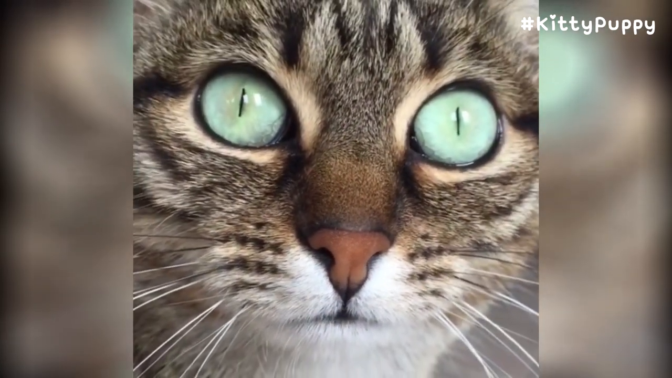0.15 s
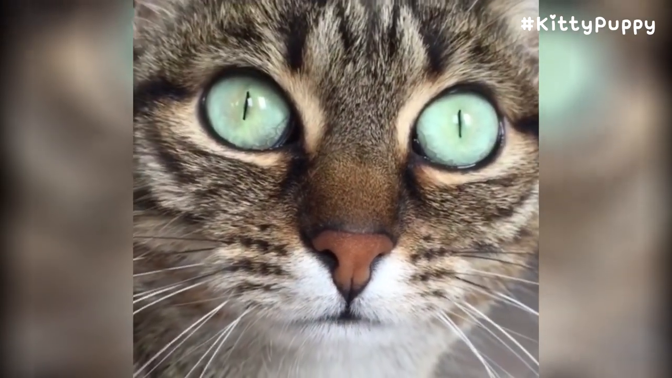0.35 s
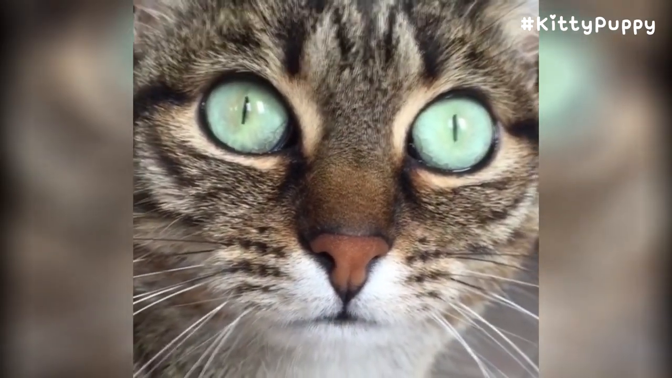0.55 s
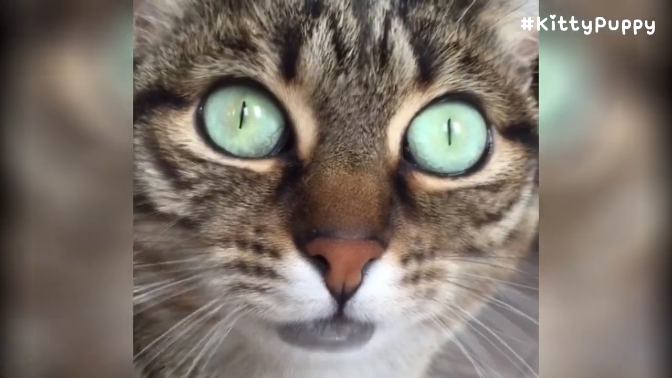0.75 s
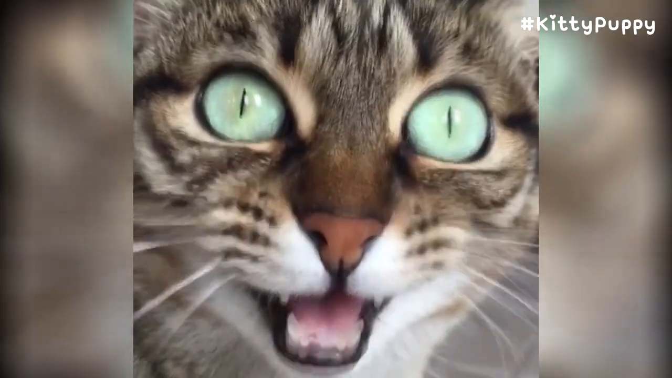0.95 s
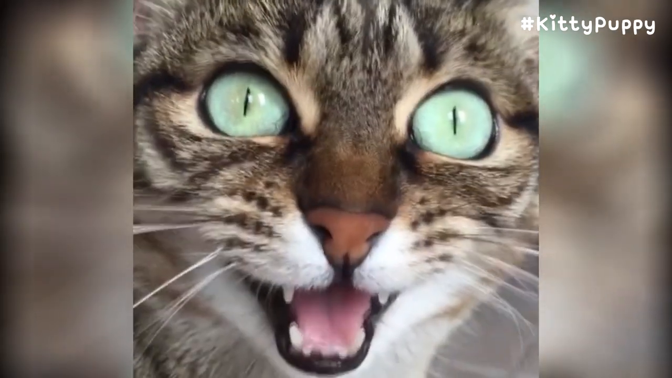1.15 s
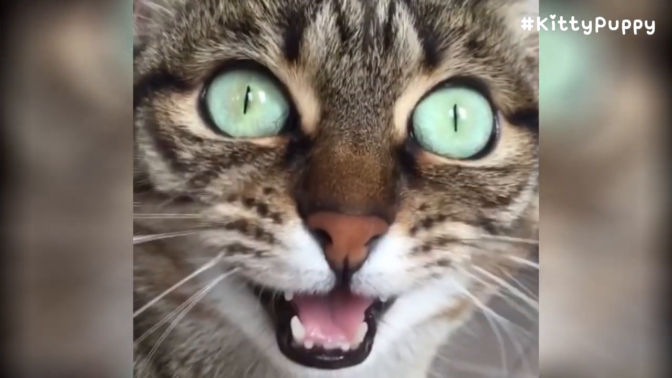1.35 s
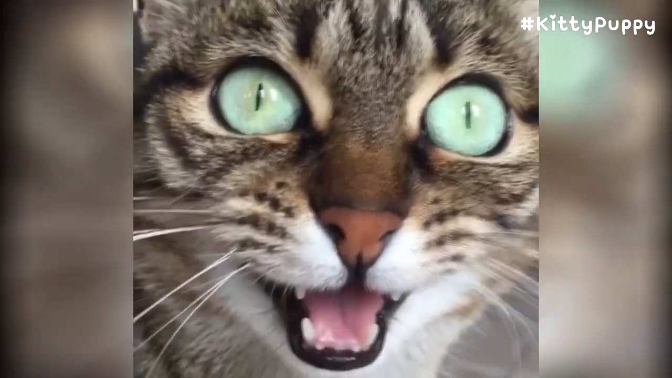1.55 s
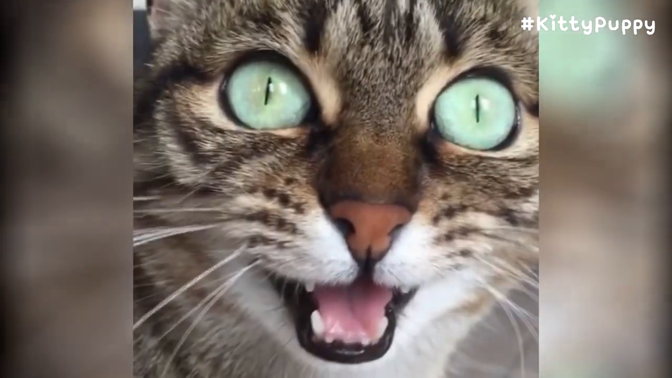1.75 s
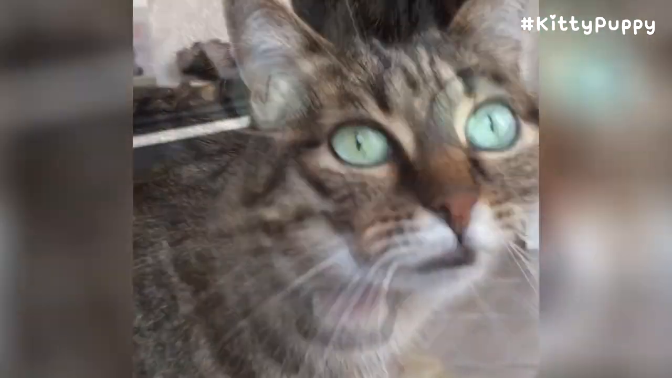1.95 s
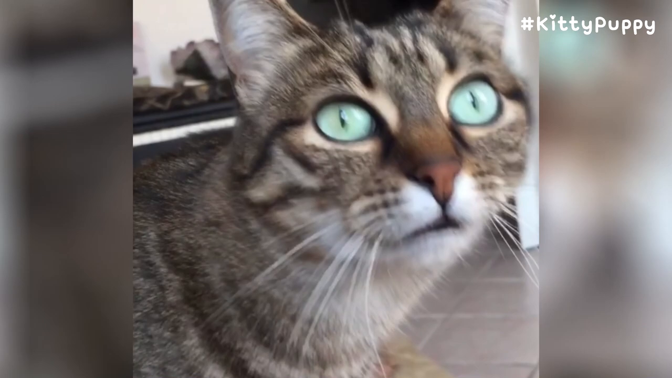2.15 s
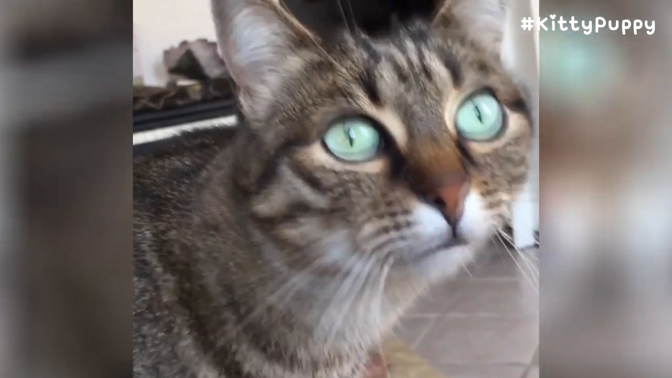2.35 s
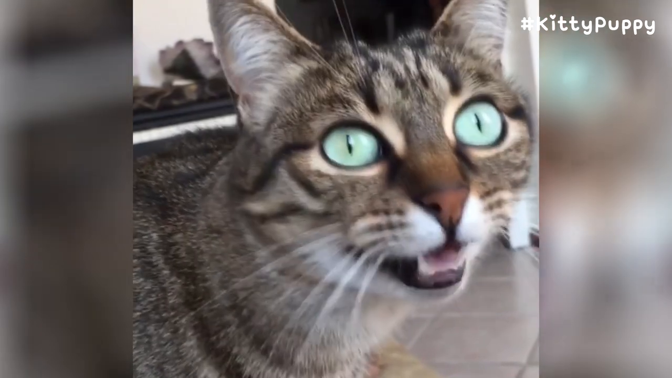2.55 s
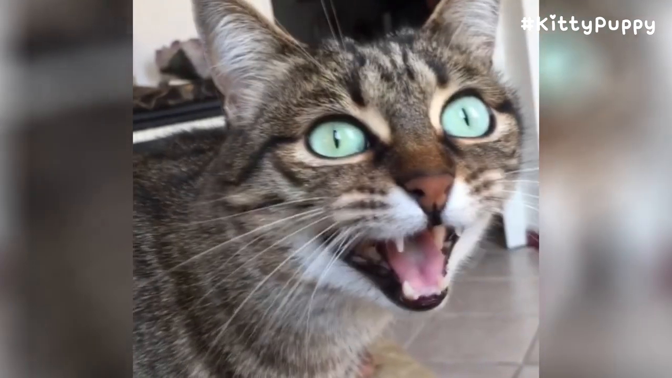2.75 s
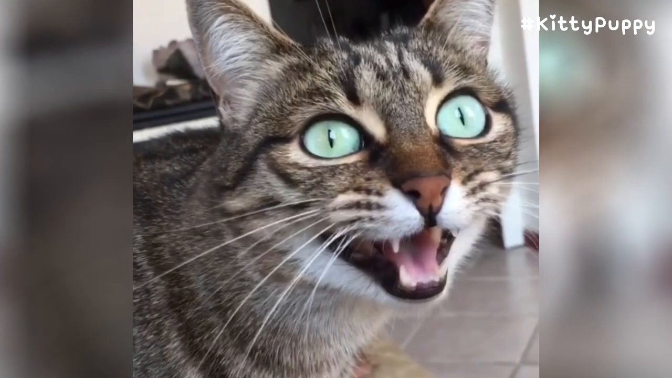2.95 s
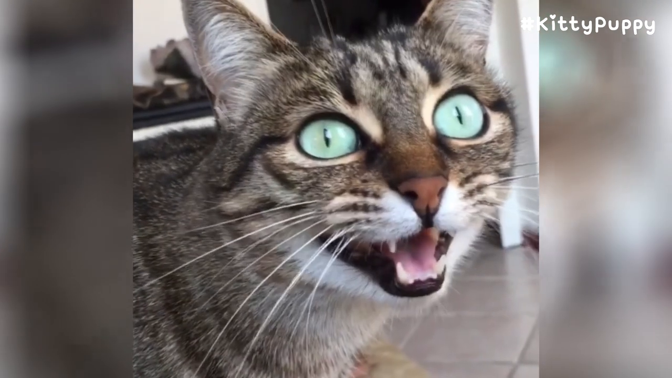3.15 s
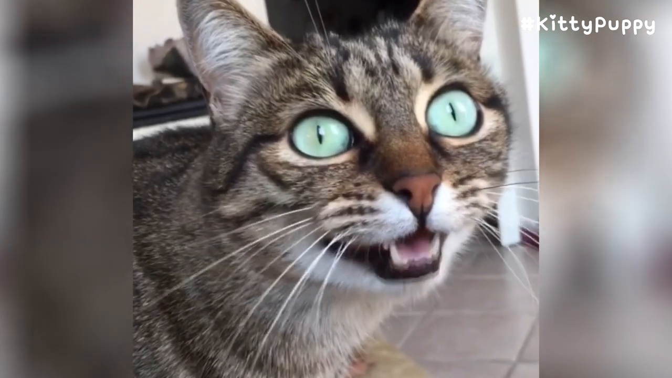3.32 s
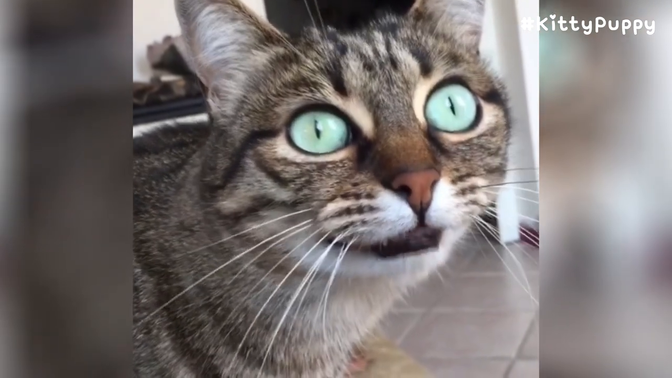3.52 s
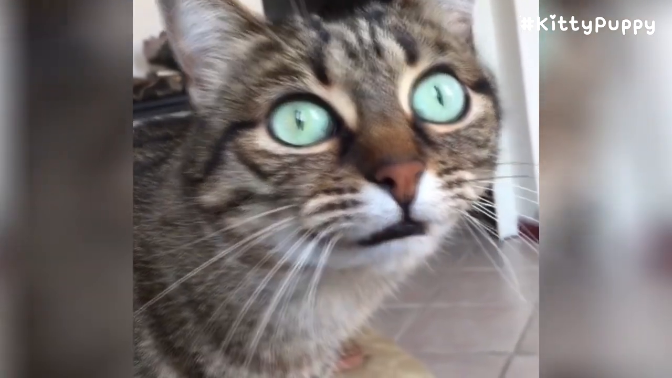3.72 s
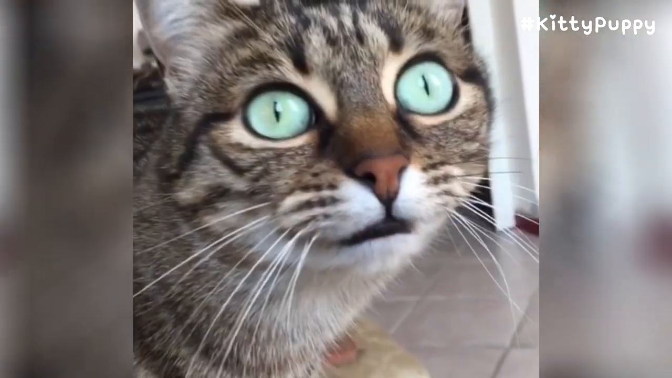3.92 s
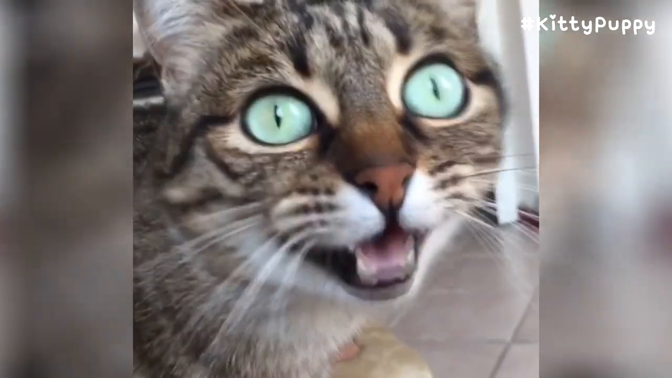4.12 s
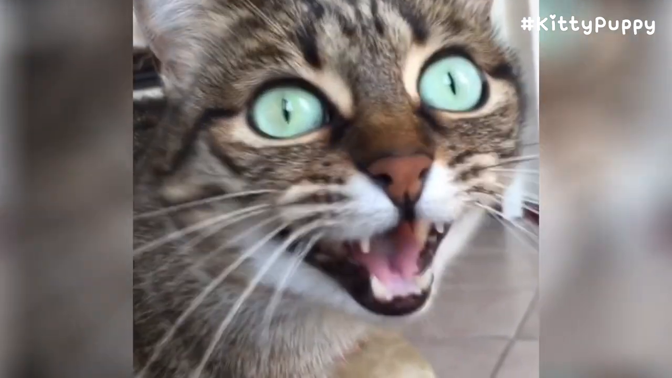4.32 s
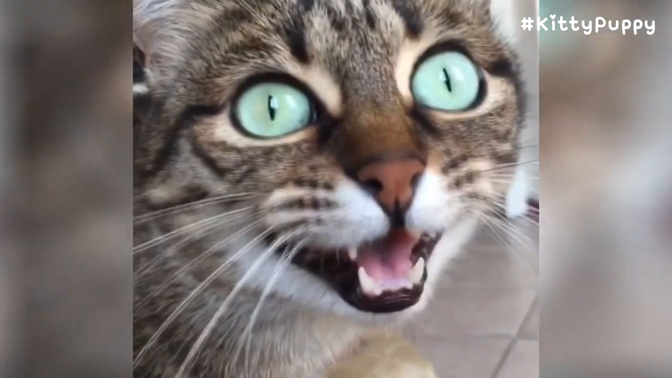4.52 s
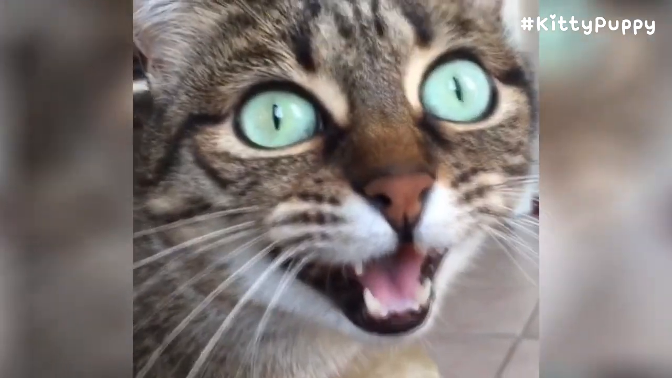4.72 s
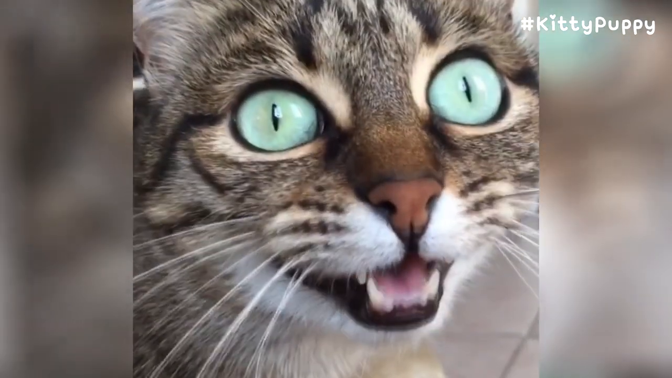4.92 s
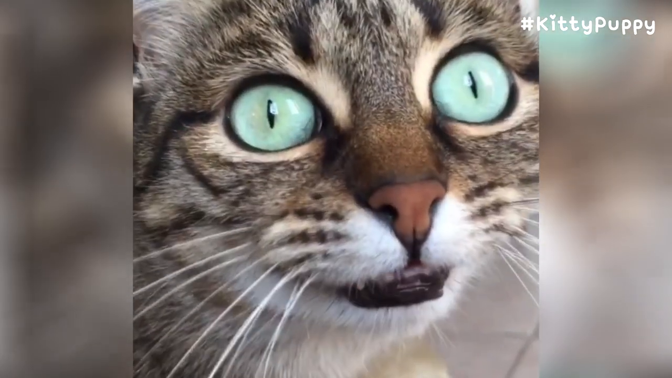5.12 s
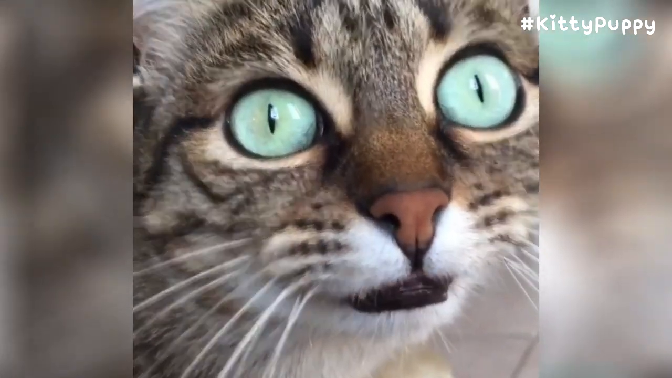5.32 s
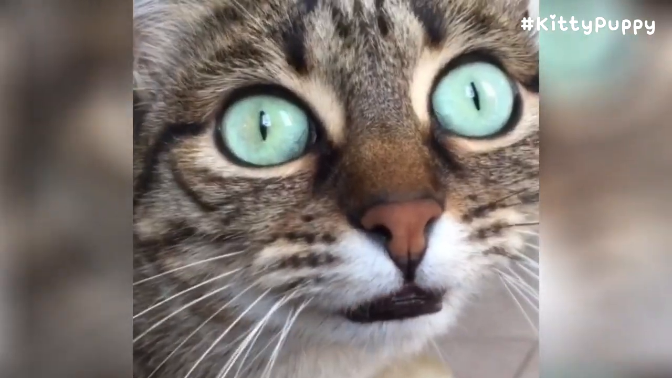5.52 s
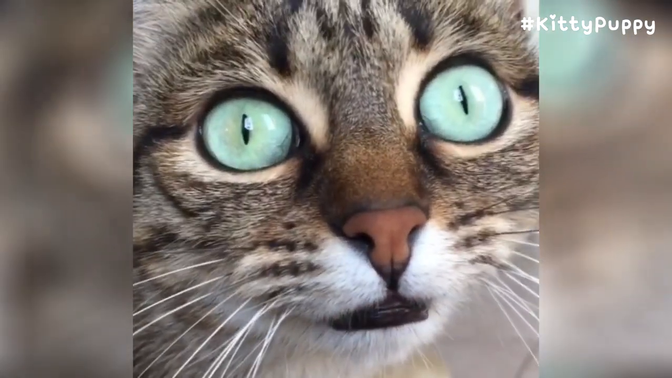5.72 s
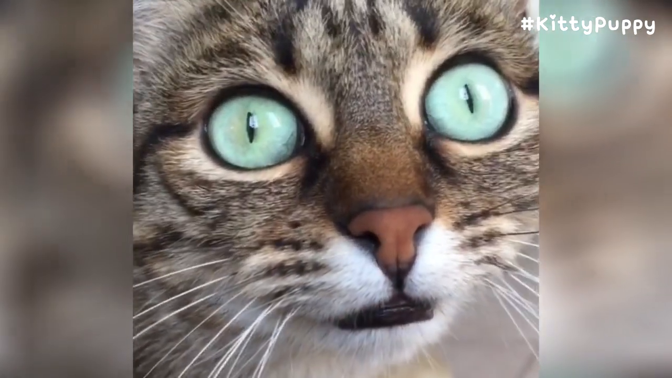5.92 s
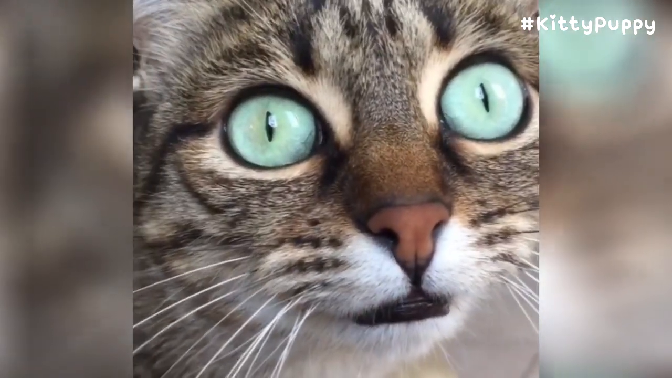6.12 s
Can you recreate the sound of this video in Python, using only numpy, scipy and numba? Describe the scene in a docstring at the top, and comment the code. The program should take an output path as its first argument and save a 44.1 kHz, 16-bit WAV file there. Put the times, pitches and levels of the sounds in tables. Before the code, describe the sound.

A cat close to the microphone gives a hoarse chatter ending in a squeak, a wavering trill, then two mews with wet mouth clicks.

```python
"""A cat close to a small microphone gives four calls: a hoarse chatter ending in a squeak, a wavering trill, two mews.
Its vocal folds send out pulses that ring the throat and mouth; tongue and lips click around the calls.
Behind it, two quiet rooms of shaped noise follow one another: the first has a low hum,
and a rumble grows late in the second."""
import sys
import numpy as np
from scipy import signal
from scipy.fft import rfft, irfft, next_fast_len
from scipy.io import wavfile
from scipy.ndimage import uniform_filter1d, map_coordinates
from numba import njit

SR = 44100
rng = np.random.default_rng(int(sys.argv[2]) if len(sys.argv) > 2 else 0)


def log_audio(samples):
    """Write samples as a 16-bit WAV file to the path given in sys.argv[1]."""
    # one column per channel
    frames = np.atleast_2d(samples).T
    # limit to full scale, then quantise
    limited = np.clip(frames, -1, 1)
    pcm = np.round(limited * 32767).astype(np.int16)
    wavfile.write(sys.argv[1], SR, pcm)


N = 276507  # length of the sound in samples


def amp(db):
    """Turn dB into a gain."""
    return 10 ** (np.asarray(db) / 20)


def along(points, hz):
    """Read a curve of (Hz, value) points on a log frequency axis."""
    point_hz, values = np.transpose(points)
    return np.interp(np.log(hz + 1), np.log(point_hz + 1), values, left=values[0], right=values[-1])


def curves(rows):
    """Draw one curve over time for each column after the first, which is the time."""
    seconds, *columns = np.transpose(rows)
    return [np.interp(np.arange(N) / SR, seconds, column) for column in columns]


def filtered(x, response):
    """Multiply the spectrum of x by a response, given as a function of frequency."""
    size = next_fast_len(N + 8192)
    hz = np.fft.rfftfreq(size, 1 / SR)
    return irfft(rfft(x, size) * response(hz), size)[:N]


def unit(x):
    """Scale x by its overall spread, to an rms of 1."""
    return x / x.std()


def noise(spectrum):
    """Coloured noise of rms 1; only the shape of the spectrum matters."""
    return unit(filtered(rng.standard_normal(N), lambda hz: amp(along(spectrum, hz))))


def even(x, size=900):
    """Hold x at an rms of 1 over a sliding stretch of samples."""
    power = np.abs(uniform_filter1d(x * x, size))
    return x / np.sqrt(power + 1e-12)


def wobble(rate):
    """A smooth random curve through `rate` random points a second."""
    points = rng.standard_normal(int(N * rate / SR) + 4)
    return map_coordinates(points, [np.arange(N) * rate / SR])


@njit
def resonate(x, hz, width_hz, rate):
    """A cavity that rings at a moving frequency; the wider the resonance, the sooner it dies."""
    y = np.zeros(len(x))
    r = np.exp(-np.pi * width_hz / rate)
    for i in range(2, len(x)):
        push = (1 - r) * (x[i] - x[i - 2])
        y[i] = push + 2 * r * np.cos(2 * np.pi * hz[i] / rate) * y[i - 1] - r * r * y[i - 2]
    return y


# The colour of each room's hiss. Each row: frequency in Hz, relative level in dB per Hz.
FIRST_ROOM_COLOUR = [(12, -33.5), (20, -4.5), (125, -3.5), (242, -13), (318, -19), (418, -20), (763, -22.5),
                     (899, -20.5), (1030, -20.5), (1220, -23), (4910, -30.5), (8490, -34), (13900, -40)]
SECOND_ROOM_COLOUR = [(12, -46.5), (20, -21), (49, -3), (129, -6), (211, -7.5), (293, -4.5), (385, -11),
                      (520, -14.5), (580, -16.5), (924, -15.5), (1000, -13), (1390, -20.5), (2340, -19.5),
                      (13900, -32.5)]
MOVE_S = 1.998  # from here on only the second room is heard
FIRST_DB, SECOND_DB = -53, -56  # hiss levels


def room_hiss(first):
    """Each room is a steady noise of its own colour; `first` is 1 in the first room, 0 in the second."""
    first_hiss = amp(FIRST_DB) * noise(FIRST_ROOM_COLOUR)
    second_hiss = amp(SECOND_DB) * noise(SECOND_ROOM_COLOUR)
    return first * first_hiss + (1 - first) * second_hiss


# Swells of the hum. Each row: time of the middle in seconds, rise over the plain hum in dB.
HUM_SWELLS = [(.45, 10.5), (.89, 18.5), (1.2, 18), (1.76, 9.5)]
HUM_DB, SWELL_S = -64, 0.086  # level between swells; half width of a swell in seconds


def hum(t):
    """A low tone near 118 Hz whose pitch and level waver, with a few smooth swells."""
    swells_db = sum(db * np.exp(-.5 * ((t - s) / SWELL_S) ** 2) for s, db in HUM_SWELLS)
    level_db = HUM_DB + swells_db + 0.43 * wobble(13.5)
    cycles = np.cumsum(118 + 3 * wobble(8.6)) / SR
    return amp(level_db) * np.sqrt(2) * np.sin(2 * np.pi * cycles)


# Fuzzy steady tones. Each row: centre in Hz, width in Hz, level in dB.
ROOM_TONES = [(47.4, 22, -64.5), (305, 2.6, -68.5)]


def room_tones():
    """Each tone is a narrow band of noise, 50 dB weaker two widths from its centre."""
    total = 0
    for hz, width_hz, db in ROOM_TONES:
        band = [(hz - 2 * width_hz, -50), (hz, 0), (hz + 2 * width_hz, -50)]
        total = total + amp(db) * noise(band)
    return total


# The colour of the rumble. Each row: frequency in Hz, relative level in dB per Hz.
RUMBLE_COLOUR = [(20, -45), (40, 4.5), (90, -0.5), (135, -1), (200, -50.5)]
RUMBLE_S, RUMBLE_DB, RUMBLE_DB_PER_S = 4.05, -65.5, 4.5  # start, level there, steady growth
SURGE_DB, SURGE_S = 10, 0.11  # extra level at the very end and how quickly it builds, in seconds


def rumble(t):
    """Low noise with an unsteady level that creeps up and surges at the end."""
    growth_db = RUMBLE_DB_PER_S * (t - RUMBLE_S)
    surge_db = SURGE_DB * np.exp((t - t[-1]) / SURGE_S)
    level_db = RUMBLE_DB + growth_db + surge_db + 5.2 * wobble(19)
    fade_in = np.clip((t - RUMBLE_S) * 10, 0, 1)
    return fade_in * amp(level_db) * noise(RUMBLE_COLOUR)


def background():
    """Hiss of two rooms, the hum of the first, fuzzy tones and a rumble that grows in the second."""
    t = np.arange(N) / SR
    first = np.clip((MOVE_S - t) / .004, 0, 1)
    return room_hiss(first) + first * hum(t) + room_tones() + rumble(t)


# How long the walls answer. Each row: frequency in Hz, time to fade by 60 dB in seconds.
WALL_FADES = [(300, .15), (3000, .11), (10000, .07)]


def walls(x):
    """The room's answer is a noise tail in which each frequency dies at its own speed."""
    hz, t, bands = signal.stft(rng.standard_normal(SR // 3), SR, nperseg=256)
    fade = amp(-60 * t / along(WALL_FADES, hz)[:, None])
    tail = signal.istft(bands * fade, SR, nperseg=256)[1]
    late = np.pad(x, (200, 0))  # the answer comes 200 samples later
    return signal.fftconvolve(late, tail / np.linalg.norm(tail))[:N]


# Tongue and lip clicks. Each row: start in seconds, level in dB, ring in Hz,
# hiss in dB relative to the click, before a shared boost.
CLICKS = [(.7068, -22, 5300, -20), (.7642, -28, 2400, -34), (.8445, -7, 2900, -22), (1.403, -33, 2900, -32),
          (1.844, -39, 2800, -6), (1.952, -38, 3160, -26), (1.9835, -43, 3000, -20),
          (2.5375, -30, 2640, -18), (2.5485, -29, 2850, -24), (3.465, -40, 2300, -18),
          (4.0727, -31, 2830, -16), (4.1095, -37, 2600, -32), (4.262, -19, 2100, -34),
          (4.3115, -12, 2450, -26), (4.316, 0, 3200, -30), (4.883, -23, 2300, -28), (5.056, -55, 2600, 10),
          (5.0903, -27, 3070, -28)]
CLICK_T60, SNAP_DB = .008, -6  # ring time of a faint click in seconds; a click this loud rings half as long


def clicks():
    """Each wet click rings two mouth cavities and the throat briefly under a spit of hiss."""
    out, t = np.zeros(N + SR), np.arange(SR // 20) / SR
    rise = 1 - np.exp(-t / .00015)
    spits = rng.standard_normal((len(CLICKS), len(t)))
    for (s, db, hz, hiss_db), spit in zip(CLICKS, spits):
        t60 = CLICK_T60 / (1 + amp(db - SNAP_DB))
        tone = lambda ratio: np.sin(2 * np.pi * ratio * hz * t)
        ring = (1.4 * tone(1) + .4 * tone(1.6) + .3 * tone(.4)) * amp(-60 * t / t60)
        hiss_fade = amp(hiss_db + 4.5 - 60 * t / 0.0048)
        hiss = hiss_fade * np.diff(spit, prepend=0)  # the difference brightens it
        out[round(s * SR):][:len(t)] += amp(db) * rise * (ring + hiss)
    return out[:N]


# Spells of uneven beating of the folds; the strongest one counts.
# Each row: start in seconds, end in seconds, hoarseness from 0 to 1.
RASPS = [(.85, .915, .55), (.945, 1.068, .76), (1.115, 1.135, .45), (1.178, 1.19, .4), (.85, 1.19, .26),
         (1.41, 1.93, .18), (1.635, 1.65, .35), (1.715, 1.75, .35), (1.79, 1.802, .4), (1.85, 1.875, .35),
         (2.56, 2.59, .48), (2.56, 2.8, .15), (3.355, 3.44, .13), (4.11, 4.31, .23), (4.315, 4.345, .55),
         (4.35, 4.45, .13), (4.45, 4.72, .09), (4.88, 5, .15)]
CLEAR, RASP_EDGE_S = .05, .012  # hoarseness of a relaxed voice; seconds for a rasp to come or go


def hoarseness():
    """A clear voice, torn by each rasp while it lasts."""
    t = np.arange(N) / SR
    spells = []
    for start, end, hoarse in RASPS:
        times = [start - RASP_EDGE_S, start, end, end + RASP_EDGE_S]
        spells.append(np.interp(t, times, [CLEAR, hoarse, hoarse, CLEAR]))
    return np.max(spells, axis=0)


def folds(pitch_hz, hoarse, waver=.1, jitter=.15, shimmer_db=5, breath=.8):
    """One pulse a cycle; hoarseness makes the pitch waver, then tears timing and size and lets air puff through."""
    cycles = np.cumsum(pitch_hz * (1 + waver * hoarse * wobble(90))) / SR
    torn = hoarse ** 1.5
    # the moment of each pulse, in samples
    at = np.interp(np.arange(1, int(cycles[-1]) - 2), cycles, np.arange(N))
    chance = rng.standard_normal((N // 40, 2))[:len(at)] * torn[at.astype(int), None]
    period = SR / pitch_hz[at.astype(int)]
    at = np.clip(at + jitter * chance[:, 0] * period, 8, N - 9)
    # a short smooth pulse lets each one fall between two samples
    taps = at.astype(int)[:, None] + np.arange(-7, 9)
    off = taps - at[:, None]
    shape = np.sinc(off) * np.cos(np.pi * off / 16) ** 2
    sized = shape * amp(shimmer_db * chance[:, 1:])
    pulses = np.bincount(taps.ravel(), sized.ravel(), N)
    puffs = rng.standard_normal(N) * (1 + np.cos(2 * np.pi * cycles)) * np.sqrt(pitch_hz / SR)
    return breath * torn * puffs - pulses, cycles


def side_cavity(hz):
    """A side cavity swallows sound around 4150 Hz."""
    return (4150 ** 2 - hz * hz + 220j * hz) / (4150 ** 2 - hz * hz + 750j * hz)


# How the cat sings each call. Each row: time in seconds, pitch in Hz, level in dB, then the throat,
# treble and fundamental, each in dB relative to the mouth.
CHATTER = [(0.852, 406, -28, -7, -17, -23), (0.866, 386.3, -22.5, -10, -24, -26),
           (0.878, 389.6, -20, -9, -15, -23), (0.896, 461, -33.5, -4, -1, -18),
           (0.908, 469, -35, -15, -5, -12), (0.936, 394.4, -32.5, 1, -18, -18),
           (0.958, 458.7, -30, -9, -15, -20), (0.974, 477, -33, 5, -22, -12),
           (1.068, 468.7, -28.5, -7.5, -29, -24), (1.08, 529.5, -27, -9, -39, -16),
           (1.122, 498.7, -28, -2.5, -29, -22), (1.162, 532.9, -31, 2.5, -34, -7.5),
           (1.194, 496, -30, 15, -30, -21)]
SQUEAK = [(1.197, 1363, -30, -7, -30, 10.8), (1.219, 1288, -32, -1, -30, 26),
          (1.247, 1296, -31, -1, -30, 29), (1.269, 1356, -53.5, -3, -30, 26),
          (1.33, 1294, -66, -3, -30, 20)]
TRILL = [(1.402, 587, -38, 4, -30, -12), (1.422, 593, -33, -5, -30, -17), (1.45, 646, -34, 0, -22, -9),
         (1.466, 579, -36.5, -1, -19, -14), (1.516, 727, -28.5, -7.5, -19, -8),
         (1.532, 765, -28, -1, -22, -13), (1.536, 993, -30, -8, -20, -1), (1.56, 1010, -28.5, -5, -21, -4),
         (1.566, 922, -23, 0, -28, -13), (1.596, 871, -32, -3, -24, -6), (1.6, 750, -31, -4, -19, -8.5),
         (1.63, 588.3, -42, -4, -18, -9), (1.638, 581, -42, 7, -14, -14),
         (1.67, 668, -36.5, -10, -16, -6.5), (1.71, 623, -44, -4, -19, -7),
         (1.716, 696.5, -34.5, -0.5, -24, -16), (1.736, 697, -35, -10, -21, -11),
         (1.748, 720.4, -30, -2, -22, -15), (1.75, 792, -41, -10, -26, -8), (1.752, 862, -33, -5, -24, -15),
         (1.756, 858, -29, 0, -24, -11), (1.76, 981.7, -30, -5, -25, -1),
         (1.782, 917.6, -35.5, -5, -22, -3), (1.8, 736.9, -43, 1, -24, -14),
         (1.808, 589, -52.5, 4, -24, -14), (1.846, 560, -37.5, 8, -27, -15),
         (1.904, 489.4, -37.5, 11, -32, 5), (1.94, 510, -62, -5, -24, 9)]
FIRST_MEW = [(2.561, 452, -32.5, -1, -13, -13), (2.577, 490, -32, -6, -20, -24),
             (2.601, 515.4, -31.5, -7.5, -25, -23), (2.623, 485, -29, 2.5, -32, -16),
             (2.677, 492.5, -29.5, -3, -25, -23), (2.707, 541.5, -28, -2.5, -35, -15.5),
             (2.753, 583.1, -26.5, -3, -11, -13), (2.821, 624.5, -22.5, 4.5, -33, -9.5),
             (2.951, 583.8, -26, -1.5, -23, -16), (3.187, 592.4, -22.5, -9, -29, -20),
             (3.279, 572.6, -25, -5.5, -27, -20), (3.317, 551, -27.5, -8.5, -22, -17.5),
             (3.357, 559, -35, 0.5, -6, -17), (3.367, 581, -34, -3.5, -9, -14),
             (3.399, 608, -41, 4.5, -14, -10), (3.459, 579, -39.5, 25, -28, -31),
             (3.478, 603, -60, 16, -22, -12)]
SECOND_MEW = [(4.118, 522, -36, 5, -16, -22), (4.126, 515, -27.5, -12, -26, -22),
              (4.146, 487, -31, 2.5, -34, -15), (4.166, 397.6, -35, 2, -15, -8),
              (4.18, 417.5, -23.5, -17, -20.5, -27), (4.208, 491.4, -29, 0.5, -17, -21),
              (4.242, 448.8, -23.5, -13, -15.5, -23), (4.278, 510.7, -24.5, -12.5, -15, -22),
              (4.298, 485.6, -17.5, -19, -23.5, -31), (4.314, 493.6, -16.5, -12, -9, -19),
              (4.318, 557, -37, 3, 6, -32), (4.32, 675, -28, -12, -7, -4),
              (4.334, 754, -24.5, -1, 1.5, -12), (4.342, 661.5, -29, -7, -12, -12),
              (4.354, 509, -27.5, -6.5, -12.5, -23), (4.408, 530, -23, -10.5, -13.5, -23),
              (4.456, 592.4, -25.5, -17.5, -19, -16.5), (4.496, 576.1, -26.5, -16.5, -16.5, -18),
              (4.564, 595, -25.5, -17.5, -17, -15), (4.58, 615.5, -23, -13.5, -16.5, -15),
              (4.62, 569, -25, -12, -18.5, -18.5), (4.63, 604.7, -20, -25, -28, -20.5),
              (4.706, 605, -25, -15, -14, -13), (4.722, 579.6, -22.5, -8.5, -23, -20),
              (4.85, 590.3, -20, -4.5, -18, -16.5), (4.89, 558, -30, 4.5, -7.5, -12.5),
              (4.932, 580, -39.5, -7.5, -11, -17), (4.995, 596, -63, 2.5, -3, -15)]
CALLS = [CHATTER, SQUEAK, TRILL, FIRST_MEW, SECOND_MEW]
# How jaw and tongue tune the cavities. Each row: time in seconds, throat in Hz, mouth in Hz,
# front cavity in dB relative to the mouth.
MOUTH_SHAPES = [(.86, 1270, 2144, -5), (.95, 1370, 1950, -4.5), (1.07, 1410, 2100, -4),
                (1.19, 1483, 2291, 1.5), (1.21, 1580, 2617, 2.5), (1.4, 1474, 2516, -3),
                (1.52, 1457, 2250, -3), (1.55, 1100, 1950, -5), (1.6, 1470, 2150, -7),
                (1.67, 1370, 2600, -2.5), (1.73, 1438, 2580, -3.5), (1.77, 946, 2060, -20),
                (1.82, 1276, 2360, 2), (1.86, 1467, 2720, -28), (1.92, 1425, 2430, -8),
                (2.57, 1122, 2000, -5), (2.75, 1283, 2410, -5.5), (2.82, 1379, 2364, 9),
                (2.96, 1504, 2366, -7.5), (3.3, 1385, 2414, -15), (3.4, 1260, 2264, 5.5),
                (4.13, 1032, 2201, -11), (4.18, 880.4, 2043, -9.5), (4.3, 984, 2320, -8),
                (4.36, 1200, 2314, -2), (4.64, 1339, 2437, -6.5), (4.85, 1351, 2433, -1.5),
                (4.95, 1220, 2343, -0.5)]
# Upper resonances. Each row: centre in Hz, width in Hz, level in dB relative to one another.
UPPER_RESONANCES = [(4580, 1390, 11.5), (5650, 1680, 4), (6260, 290, -13), (8850, 1400, -37.5)]
# The colour of the hiss past the teeth. Each row: frequency in Hz, relative level in dB per Hz.
AIR_COLOUR = [(3000, -26), (6000, -7.5), (8000, 1.5), (11000, -5), (14000, -5.5)]
# the first overtone stands out as the chatter begins: time in seconds, level in dB, seconds to fade by 60 dB
OCTAVE_S, OCTAVE_DB, OCTAVE_T60 = 0.862, -37.5, 0.74


def voice():
    """The fold pulses ring throat, mouth, front cavity and upper resonances."""
    pitch_hz, level_db, throat_db, treble_db, base_db = curves(np.concatenate(CALLS))
    throat_hz, mouth_hz, front_db = curves(MOUTH_SHAPES)
    t = np.arange(N) / SR
    sounding = np.zeros(N)
    for call in CALLS:
        sounding[round(call[0][0] * SR):round((call[-1][0] + .006) * SR)] = 1
    sounding = uniform_filter1d(sounding, size=130)  # soft edges

    hoarse = hoarseness()
    source, cycles = folds(pitch_hz, hoarse)
    fundamental = amp(base_db) * np.sin(2 * np.pi * cycles)
    octave_db = OCTAVE_DB - 60 * np.abs(t - OCTAVE_S) / OCTAVE_T60
    octave = (t < SQUEAK[0][0]) * amp(octave_db) * np.sin(4 * np.pi * cycles)

    # each cavity is two resonances in a row, one narrow and one wide
    twice = lambda hz, narrow_hz, wide_hz: resonate(resonate(source, hz, narrow_hz, SR), hz, wide_hz, SR)
    drift = lambda db, rate: amp(db * wobble(rate))  # the tongue never rests, so each cavity swells on its own
    throat = unit(twice(throat_hz, 330., 700.)) * drift(1.2, 35)
    mouth = unit(twice(mouth_hz, 330., 700.)) * drift(1.3, 35)
    front = unit(twice(np.full(N, 3080.), 570.0, 920.0)) * drift(4.2, 35)
    treble = np.zeros(N)
    for k, (hz, width_hz, db) in enumerate(UPPER_RESONANCES):
        ring = twice(np.full(N, 1. * hz), 1. * width_hz, 2.5 * width_hz)
        treble += (-1) ** k * amp(db) * ring * drift(5.5, 14)  # neighbours have opposite signs
    treble = even(treble)
    air = amp(-5) * hoarse ** 2 * noise(AIR_COLOUR)  # torn folds let air spray out

    # a squeak on the throat resonance is all fundamental
    throat_gain = amp(throat_db) * np.clip(throat_hz / pitch_hz - 1, 0, .5) * 2
    rings = throat_gain * throat - mouth + amp(front_db) * front - amp(treble_db) * (treble + air)
    call_sound = amp(level_db) * even(rings + np.sqrt(2) * fundamental)
    return filtered(sounding * (call_sound + np.sqrt(2) * octave), side_cavity)


def scene():
    """The cat, a little of the walls' answer, and the rooms behind."""
    cat = voice() + clicks()
    return (cat + amp(-21) * walls(cat) + background())[None]


TOP_HZ = 16000  # band limit


def record(dry):
    """The deepest bass is cut, the sound above 14 kHz is faint, and nothing is left above TOP_HZ."""
    colour = [(20, -30), (33, -16), (41, 0), (13900, 0), (14100, -18), (TOP_HZ, -20)]  # (Hz, dB)
    return filtered(dry[0], lambda hz: amp(along(colour, hz)) * (hz < TOP_HZ))[None]


dry = scene()
out = record(dry)
log_audio(out)
```